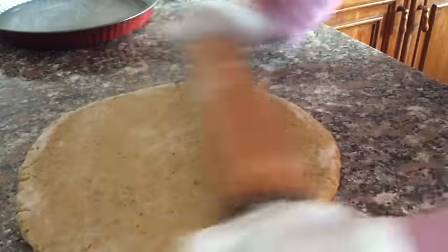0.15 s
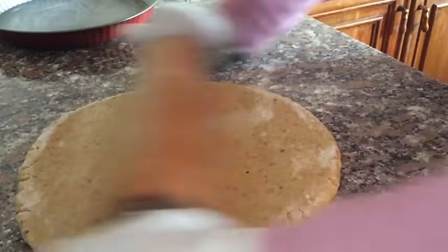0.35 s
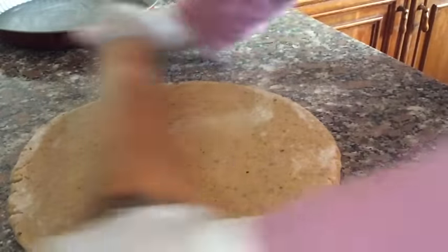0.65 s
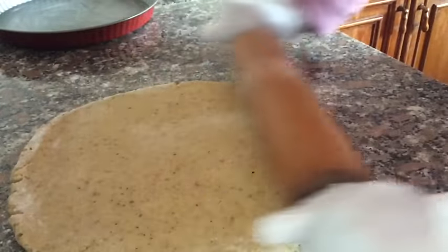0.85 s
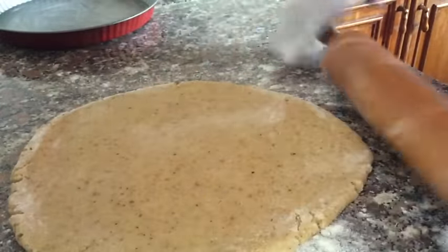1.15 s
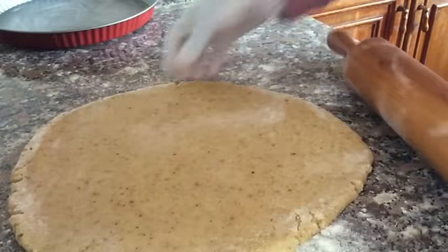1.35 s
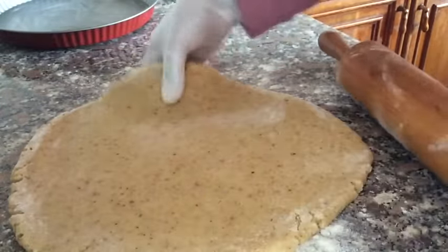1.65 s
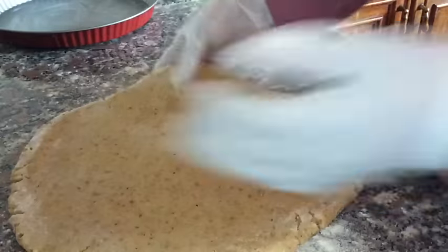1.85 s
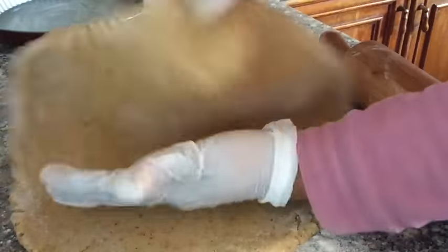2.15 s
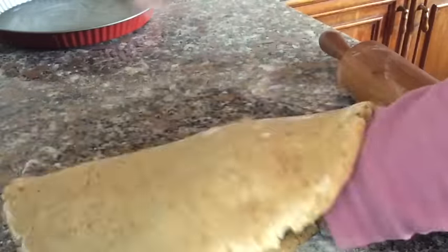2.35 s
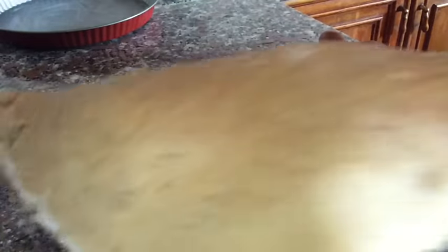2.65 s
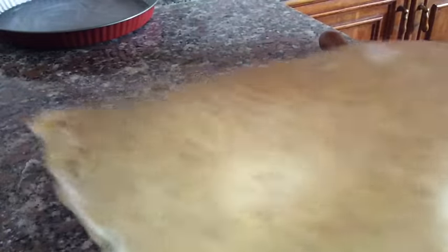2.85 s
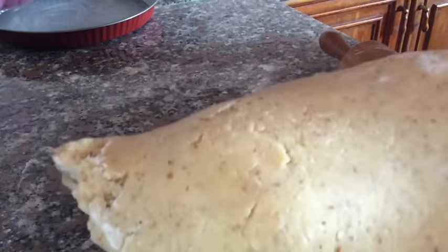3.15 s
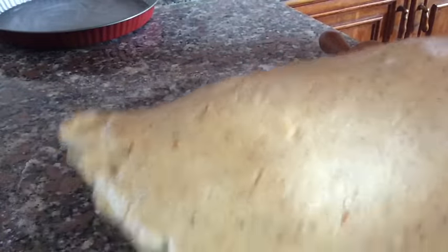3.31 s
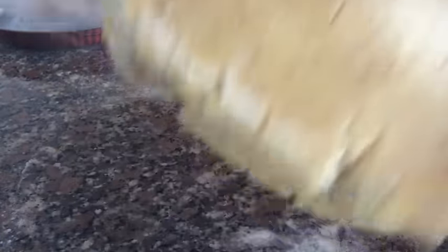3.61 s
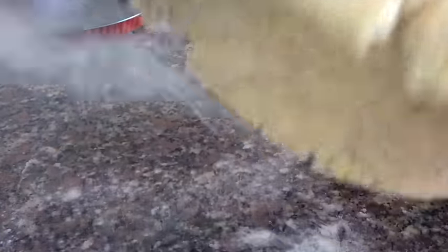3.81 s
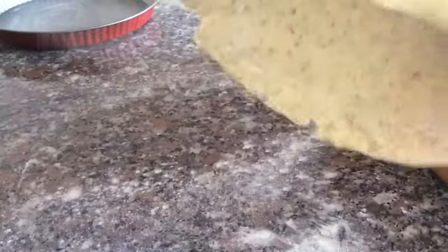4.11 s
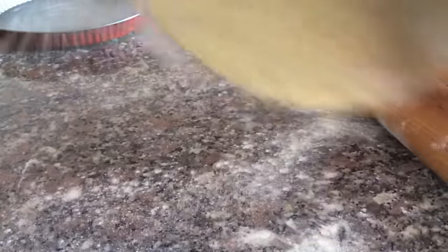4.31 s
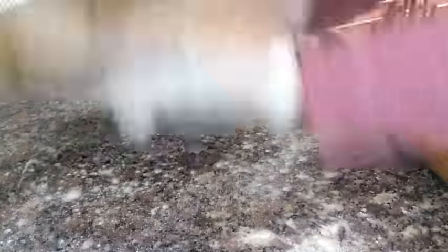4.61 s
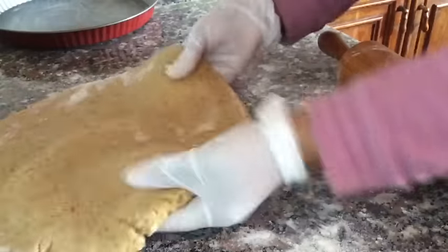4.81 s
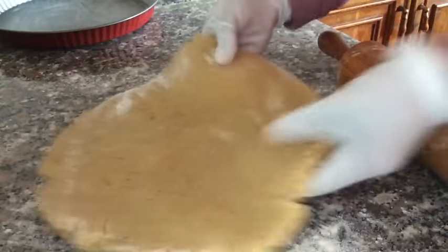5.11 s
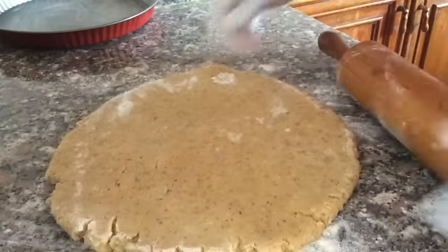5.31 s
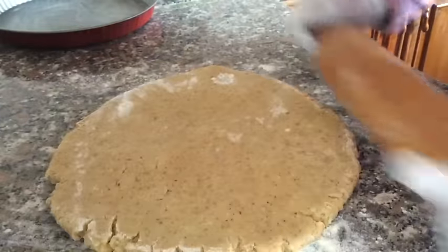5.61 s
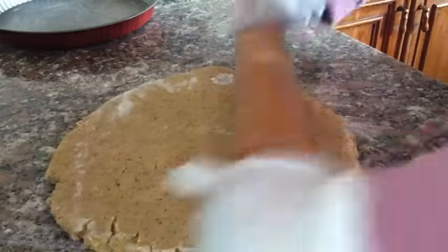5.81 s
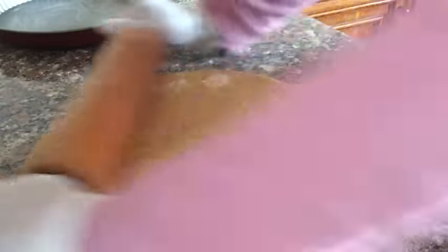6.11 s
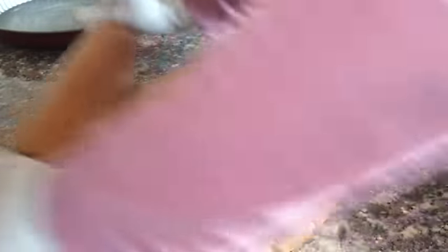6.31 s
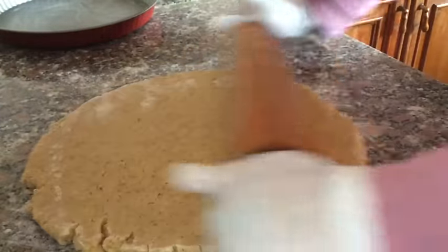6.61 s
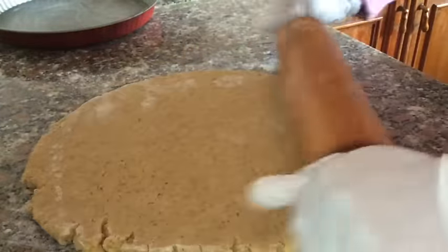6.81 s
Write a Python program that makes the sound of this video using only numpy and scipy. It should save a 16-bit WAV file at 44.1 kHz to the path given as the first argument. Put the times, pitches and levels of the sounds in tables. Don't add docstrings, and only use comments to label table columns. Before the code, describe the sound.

A wooden rolling pin is set down with a ringing knock, then gloved hands sweep flour, drag and slap heavy dough on a stone kitchen counter.

```python
import sys
import numpy as np
from scipy import signal
from scipy.fft import rfft, irfft, next_fast_len
from scipy.io import wavfile
from scipy.ndimage import uniform_filter1d, map_coordinates

SR = 44100
rng = np.random.default_rng(int(sys.argv[2]) if len(sys.argv) > 2 else 0)


def wav_record(signal):
    frames = np.transpose(np.atleast_2d(signal))
    bounded = np.clip(frames, -1, 1)
    quanta = np.round(bounded * 32767).astype(np.int16)
    wavfile.write(sys.argv[1], SR, quanta)


def ratio_of_db(decibels):
    return 10 ** (np.asarray(decibels, float) / 20)


N = 306936
ENVELOPE_STEP = 32

# start t/s, end t/s, flour hiss level/dB, wood hum level/dB
ROLLS = [
    (-.02, .32, -64, -65),
    (.29, .63, -65, -76),
    (.61, 1.0, -65, -73),
    (2.15, 2.62, -80, -80),
]


def pin():
    # t/s, peak level/dB, bending modes over peak/dB, contact/ms, bending tilt/(dB per octave)
    knocks = [
        (1.1555, -14.5, 15.5, 0.36, -1),
        (1.1603, -18, 21, 0.68, 1),
        (5.9022, -21, 7, .4, 8),
        (5.9078, -9, -5, .3, 6),
        (6.3928, -56, 25.5, 0.5, -2.5),
        (6.8491, -60, 35, 0.6, -2.5),
    ]
    # f/Hz, level/dB, t60/s
    bending = [(365, -2, .022), (520, -2, .018), (660, -5, .016), (800, -1.5, .016), (1000, 0, .018),
               (1160, -1, .018), (1320, -5, .016), (1500, -8, .016), (1680, -12, .016), (1870, -13, .014),
               (2020, -13, .014), (2200, -15, .014)]
    # f/Hz, level/dB, t60/s
    wall_modes = [(2415, -17, .035), (2650, -12, .03), (2790, -17, .03), (2897, -1, .042), (2947, -1, .042),
                  (3060, -18, .03), (3160, -17, .03), (4200, -19, .008), (5230, -28, .012)]
    out = np.zeros(N)
    for s, db, bend_db, contact_ms, tilt_db in knocks:
        wall_ring = struck(wall_modes, contact_ms, spread_db=1)
        bar_ring = struck(tilted(bending, tilt_db, 1100), contact_ms, spread_db=2)
        add(out, s, ratio_of_db(db - 3) * wall_ring)
        add(out, s, ratio_of_db(db + bend_db - 4) * bar_ring)
    rumbling_wood = struck(wall_modes[3:5], .1, spread_db=0)
    hum = unit(signal.fftconvolve(rng.standard_normal(N), rumbling_wood)[:N])
    hum_level = sum(ratio_of_db(db) * rolling(start, end) ** 1.3 for start, end, _, db in ROLLS)
    return out + hum * fine(hum_level)


def rolling(start, end):
    return np.sin(np.pi * np.clip((clock() - start) / (end - start), 0, 1)) ** 2


def sweeps():
    # f/Hz, level/dB per Hz
    hiss_colour = [(1500, -23), (2600, -3), (3100, 0), (5200, 1.2), (6000, -2.5), (9000, 1.2), (13500, .7),
                   (15500, -4)]
    scrape_colour = [(600, -16.5), (1000, 1.5), (1500, 1), (2100, -2), (3100, -2.5), (4500, -8),
                     (7000, -25.5)]
    drag_colour = [(60, -42.5), (130, -2), (230, 0), (290, -4.5), (390, 0), (650, -7), (1100, -40)]
    stutter = ratio_of_db(1.3 * wobble(30) + .6 * wobble(90))
    grip = .55
    hiss = motion(1, [-1.5, 0, 0, -30], loss=0) * rush(hiss_colour, patchy_db=1.55, grit_db=1.5)
    scrape = motion(grip, [-3, -10, -8, 3], loss=.2) * rush(scrape_colour, patchy_db=3, grit_db=4.5)
    lurch = ratio_of_db(2.7 * wobble(60))
    drag = motion(grip, [-5, -16, -8, 1.5], loss=.3) * lurch * rush(drag_colour, patchy_db=2.5)
    return stutter * (hiss + scrape + drag)


def motion(grip, gains_db, loss):
    # peak t/s, level/dB, 20 dB rise/s, 20 dB fall/s
    brushes = [(1.232, -48, .08, .045), (1.29, -62, .05, .1), (1.4, -58, .02, .2), (1.48, -55, .12, .14),
               (1.65, -40.5, .07, .09), (1.8, -55, .25, .13), (1.985, -59, .12, .06), (2.14, -54, .08, .25),
               (2.33, -55, .07, .1), (2.55, -68, .4, .4), (3.84, -69, .04, .03), (3.965, -70, .02, .02),
               (4.19, -69, .02, .06), (4.3, -73, .1, .1), (4.47, -70, .3, .3), (4.555, -42, .02, .08),
               (4.615, -47.5, .02, .1), (4.918, -44, .012, .022), (5.032, -59, .4, .6), (5.15, -54, .1, .2),
               (5.245, -39.5, .07, .085), (5.45, -58, .07, .2), (5.62, -61, .1, .15),
               (5.79, -54.5, .1, .09), (6.035, -49, .11, .11), (6.24, -66, .6, .12), (6.49, -68, .15, .2),
               (6.64, -39.5, .06, .045), (6.74, -64, .05, .2), (6.86, -66, .03, .1)]
    # t/s, hold/s, level/dB, 20 dB rise/s, 20 dB fall/s
    wipes = [
        (.93, .13, -61.5, .3, .15),
        (5.5, .035, -41, .035, .065),
        (6.548, .085, -43.5, .016, .05),
    ]
    pushes = [
        (2.69, .06, -46.5, .007, .18),
        (2.83, .03, -41.5, .04, .1),
        (2.9, .05, -30, .1, .08),
        (3.049, .004, -49, .05, .22),
        (3.385, .095, -25.5, .13, .045),
        (3.535, .004, -54, .03, .1),
        (4.735, .02, -36.5, .065, .115),
    ]
    sheet_drags = [
        (2.69, .16, -47, .01, .12),
        (3.0, .13, -53, .05, .05),
        (1.13, .02, -52, .04, .02),
        (3.355, .09, -32.5, .035, .095),
        (2.2, .15, -73, .1, .08),
        (4.56, .03, -60, .03, .06),
        (5.89, .012, -56, .02, .02),
        (5.93, .14, -53, .02, .05),
        (6.56, .1, -54, .02, .04),
        (6.83, .015, -66, .04, .02),
    ]

    def held(rows):
        return [stroke(s, hold, db, rise * grip, fall) for s, hold, db, rise, fall in rows]

    rolls = [ratio_of_db(db) * rolling(start, end) ** (.35 / grip ** 2) for start, end, db, _ in ROLLS]
    brushed = [stroke(s, 0, db, rise * grip, fall) for s, db, rise, fall in brushes]
    kinds = [rolls, brushed + held(wipes), held(pushes), held(sheet_drags)]
    levels = np.array([np.linalg.norm(kind, axis=0) for kind in kinds])
    levels = levels * ((levels + 1e-6) / ratio_of_db(-50)) ** -loss
    return fine(np.linalg.norm(ratio_of_db(np.array(gains_db))[:, None] * levels, axis=0))


def stroke(s, hold, db, rise, fall):
    t = clock() - s
    before = np.maximum(-t / rise, 0)
    after = np.maximum((t - hold) / fall, 0)
    return ratio_of_db(db - 20 * before ** 1.25 - 20 * after ** 1.25)


def pats():
    # t/s, peak level/dB, pitch f/Hz, overtones level/dB
    pat_events = [(1.125, -43, 334, -29), (1.573, -36.5, 272, -35), (2.686, -29, 257, -13.5),
                  (2.709, -36.5, 306, -18), (2.823, -27, 377, -26), (2.857, -27, 365, -7),
                  (3.0246, -32, 370, .6), (3.142, -52.5, 403, 3), (3.1977, -11, 413, -6.5),
                  (4.554, -52, 1290, -1.5), (4.574, -50, 377, -15), (4.7262, -20.5, 538, -21),
                  (4.744, -27, 435, -14), (4.779, -40, 467, -10), (4.7933, -17.5, 517, -27),
                  (4.823, -24.5, 386, -24), (4.914, -44, 334, -21), (5.196, -47, 467, -7),
                  (5.2163, -37.5, 1155, -24), (5.2973, -39, 350, -9.5), (5.5262, -26, 381, -16.5),
                  (5.7533, -42, 353, -6), (5.905, -19.5, 1213, -7.5), (6.275, -42.5, 378, -18),
                  (6.392, -39, 360, -7), (6.548, -46, 1200, -3), (6.632, -36, 1430, -6),
                  (6.8484, -27, 1056, -38)]
    # t/s, peak level/dB
    snap_events = [(1.574, -48.5), (2.687, -32.5), (2.824, -36), (2.858, -29.5), (3.0258, -22.5),
                   (3.1989, -32), (4.555, -42), (4.575, -39), (4.745, -35.5), (4.78, -44), (4.7945, -45),
                   (4.824, -43.5), (4.915, -35.5), (5.2175, -47.5), (5.5274, -42), (5.906, -23.5),
                   (6.393, -42), (6.545, -42), (6.633, -44.5)]
    # f/Hz, level/dB per Hz
    snap_colour = [(300, -20.5), (800, -8.5), (2500, 2), (5500, 3), (8000, -6), (15000, -17)]
    pop_t60 = .022
    pops, snaps = np.zeros(N), np.zeros(N)
    t = np.arange(SR // 10) / SR
    for s, db, hz, over_db in pat_events:
        s = s + .0012
        top_db = .6 * (db + 11)
        ratios = [(2.1, 2.5), (2.9, 4), (3.7, 6.5), (6.3, 2.2 + top_db)]
        overtones = [(k * hz, over_db + level, pop_t60 / k ** 0.6) for k, level in ratios]
        add(pops, s, ratio_of_db(db + 2.0) * struck([(hz, 0, pop_t60)], 150 / hz, spread_db=0))
        add(pops, s + 0.26 / hz, ratio_of_db(db - 1.5) * struck(overtones, 0.13, spread_db=3))
    for s, db in snap_events:
        burst = ratio_of_db(db - 60 * t / 0.037) * (1 - np.exp(-t / 0.00073))
        add(snaps, s, burst * rng.standard_normal(len(t)))
    return pops + filtered(snaps, lambda hz: ratio_of_db(along(snap_colour, hz)))


def counter():
    # t/s, peak level/dB, contact/ms, tilt/(dB per octave)
    thuds = [(1.1517, -20.5, 4.5, 17), (1.571, -36, 2.5, 10), (1.609, -49, 2.9, 4), (2.7, -34, 2, 2),
             (2.856, -42, 1.9, -1), (2.966, -38, 1.6, 6), (3.372, -39, 3.2, -8), (3.511, -39, 1.9, -6),
             (4.724, -21, 2.5, 0.5), (4.74, -27, 2.5, -4), (4.999, -38, 2.1, -10), (5.527, -27, 2.4, -1),
             (5.89, -25, 1.9, -5), (5.904, -21.5, 1.7, -3), (6.3908, -19, 2.2, -7)]
    # f/Hz, level/dB, t60/s
    slab_modes = [(59.5, -2, 0.098), (86.5, 4, 0.13), (140, -2, 0.16), (160.6, -3.5, 0.18),
                  (175.5, -8.5, 0.26), (228, -10, 0.07), (290, -15, 0.049)]
    out = np.zeros(N)
    for s, db, contact_ms, tilt_db in thuds:
        add(out, s, -ratio_of_db(db - 3) * struck(tilted(slab_modes, tilt_db, 110), contact_ms, spread_db=2))
    return out


def walls(x):
    # f/Hz, t60/s
    decay = [(100, 0.56), (500, 0.61), (1200, 0.68), (3000, 0.43), (8000, 0.35)]
    out = np.zeros(N)
    stretch = 116 * SR // 100
    for start in range(0, N, stretch):
        hz, t, z = signal.stft(rng.standard_normal(SR), SR, nperseg=256)
        fading = ratio_of_db(-60 * t / along(decay, hz)[:, None])
        tail = signal.istft(z * fading, SR, nperseg=256)[1]
        echo = signal.fftconvolve(x[start:start + stretch], tail / np.linalg.norm(tail))
        add(out, start / SR + .006, echo)
    return out


def fridge():
    # f/Hz, level/dB rms
    hum_tones = [(48.4, -69.5), (96.9, -68.5), (172.3, -68), (344.5, -76), (489.9, -66), (543.7, -90),
                 (689.1, -78)]
    # f/Hz, level/dB per Hz
    air_colour = [(15, -39), (25, -15.5), (164, 3), (240, -7), (349, -4.5), (433, -12), (482, -9.5),
                  (700, -30)]
    fan_colour = [(500, -20), (598, -10), (684, 0.5), (762, -1), (1080, -1.5), (1620, -15), (4000, -18),
                  (15500, -20)]
    t = np.arange(N) / SR
    tones = np.zeros(N)
    for hz, db in hum_tones:
        level = ratio_of_db(db + 2.5 + 0.4 * wobble(6.6))
        tones += level * np.sin(2 * np.pi * hz * t + 0.56 * wobble(8.8))
    air = ratio_of_db(-59.5 + 0.28 * wobble(2.7)) * rush(air_colour, patchy_db=.2)
    fan = ratio_of_db(-73) * rush(fan_colour, patchy_db=.2)
    return tones + air + fan


def struck(modes, contact_ms, spread_db):
    t = np.arange(SR // 3) / SR
    ring = np.zeros(len(t))
    for hz, db, t60 in modes:
        ring += ratio_of_db(db + spread_db * rng.normal() - 60 * t / t60) * np.sin(2 * np.pi * hz * t)
    return ring * (1 - np.exp(-1000 * t / max(contact_ms, .02))) ** 2


def tilted(modes, tilt_db, pivot):
    return [(hz, db + tilt_db * np.log2(hz / pivot), t60) for hz, db, t60 in modes]


def rush(spectrum, patchy_db, grit_db=0):
    grains = rng.standard_normal(N) * ratio_of_db(grit_db * wobble(900))
    z = signal.stft(grains, nperseg=512)[2]
    patches = uniform_filter1d(rng.standard_normal(z.shape), 6, 0)
    patches = unit(uniform_filter1d(patches, 6, 1))
    x = signal.istft(z * ratio_of_db(patchy_db * patches), nperseg=512)[1][:N]
    return unit(filtered(x, lambda hz: ratio_of_db(along(spectrum, hz))))


def unit(x):
    return x / np.sqrt(np.mean(x ** 2) + 1e-20)


def along(points, hz):
    f, v = np.transpose(points)
    return np.interp(np.log(hz + 1), np.log(f + 1), v)


def wobble(rate):
    knots = rng.standard_normal(int(N * rate / SR) + 4)
    return map_coordinates(knots, [np.arange(N) * rate / SR])


def filtered(x, response):
    m = next_fast_len(N + SR // 2)
    return irfft(rfft(x, m) * response(np.fft.rfftfreq(m, 1 / SR)), m)[:N]


def add(track, s, sound):
    part = track[round(s * SR):][:len(sound)]
    part += sound[:len(part)]


def clock():
    return np.arange(0, N + ENVELOPE_STEP, ENVELOPE_STEP) / SR


def fine(env):
    return np.interp(np.arange(N) / SR, clock(), env)


def scene():
    wood, dough, slab, hands = pin(), pats(), counter(), sweeps()
    others = ratio_of_db(-15.5) * dough + ratio_of_db(-8.5) * slab + ratio_of_db(-17.5) * hands
    echo = ratio_of_db(-9.5) * walls(wood) + walls(others)
    low_hz = 44.4
    near = filtered(wood + dough + slab + hands + echo, lambda hz: (1j * hz / (low_hz + 1j * hz)) ** 2)
    return (near + fridge())[None]


def roll_off(x):
    return signal.sosfilt(signal.butter(12, 16020, fs=SR, output="sos"), x)


def record(dry):
    mix = filtered(dry[0], lambda hz: hz < 15490)[None]
    return roll_off(mix)


dry = scene()
out = record(dry)
wav_record(out)
```